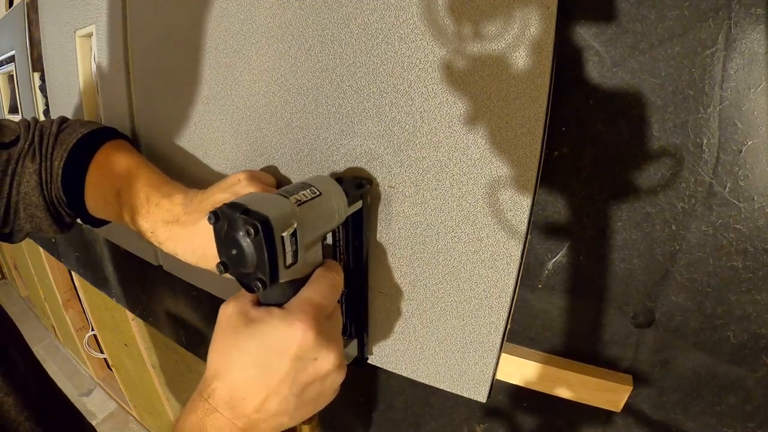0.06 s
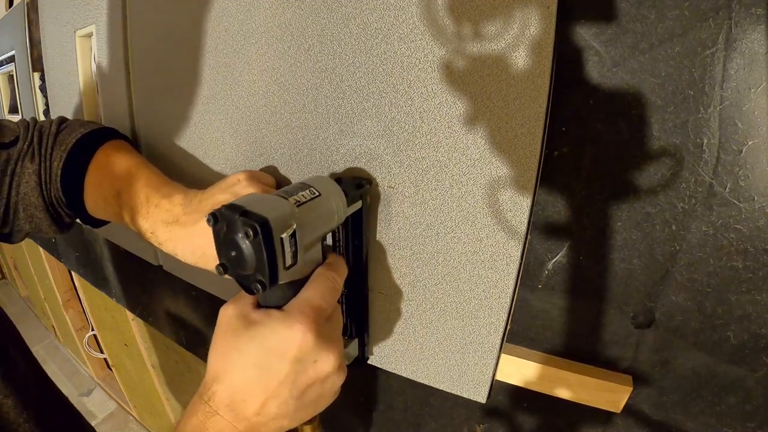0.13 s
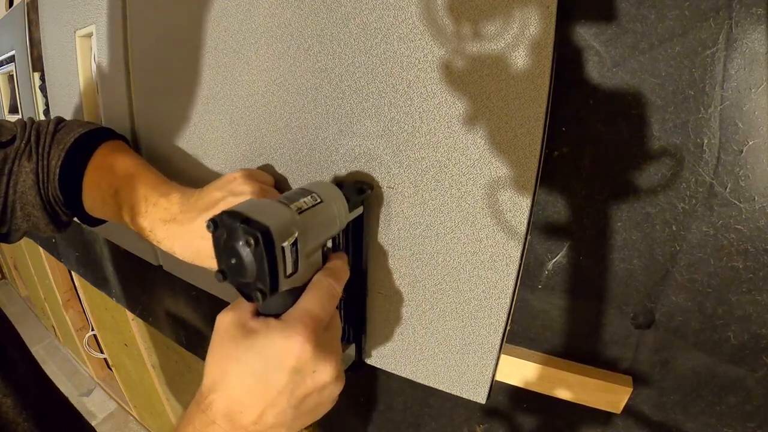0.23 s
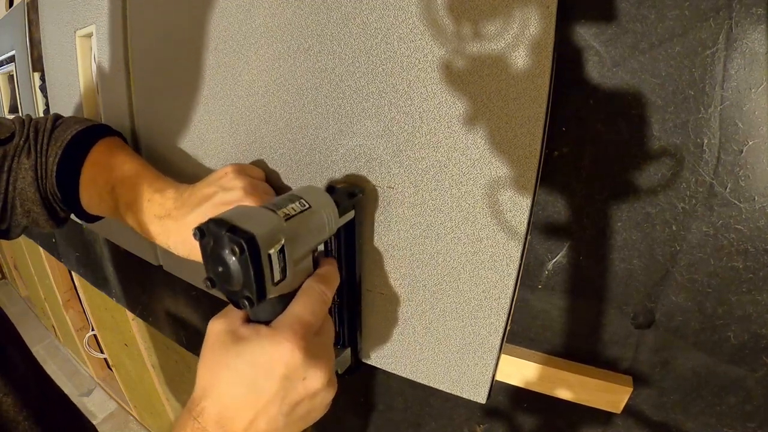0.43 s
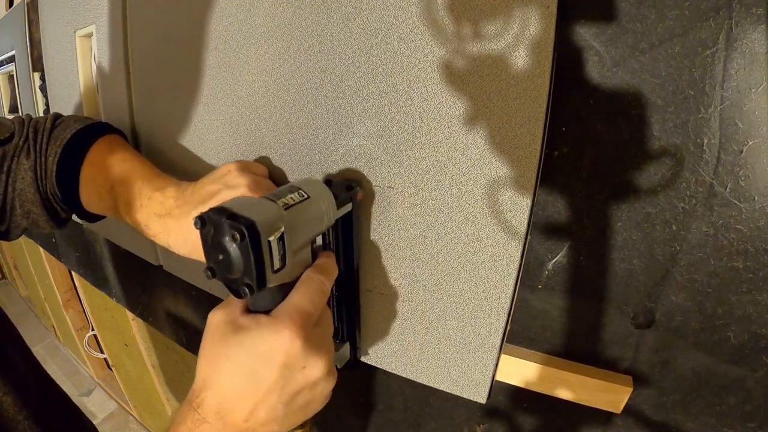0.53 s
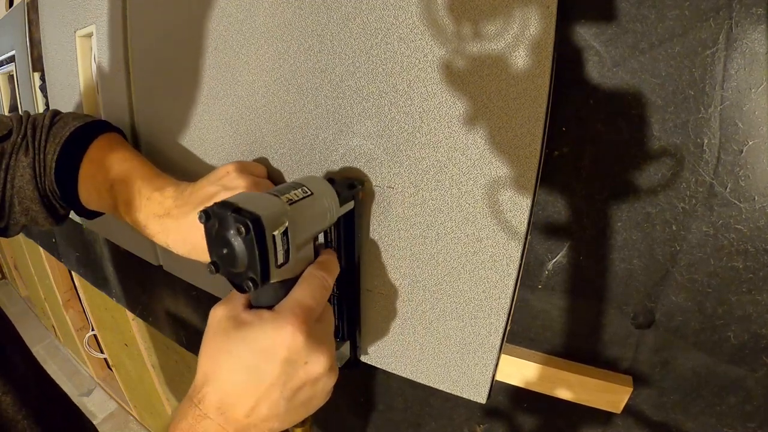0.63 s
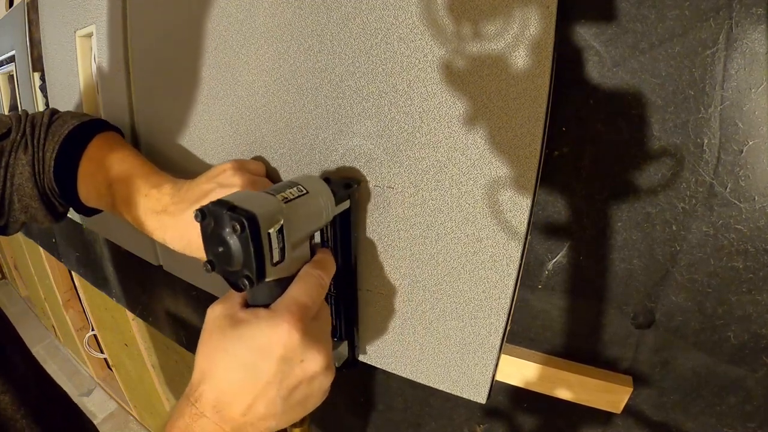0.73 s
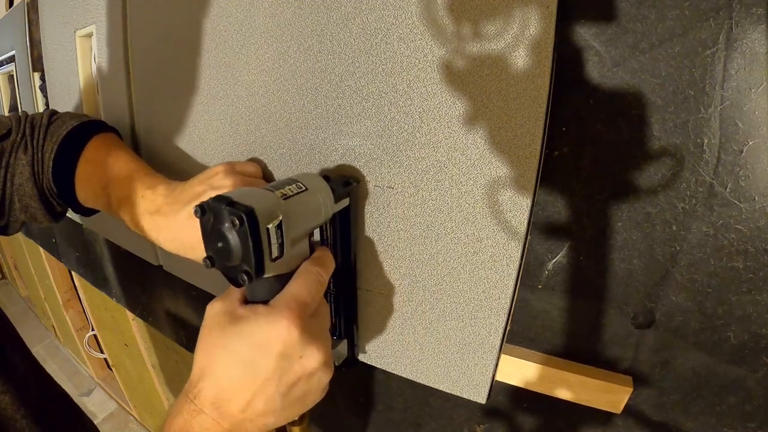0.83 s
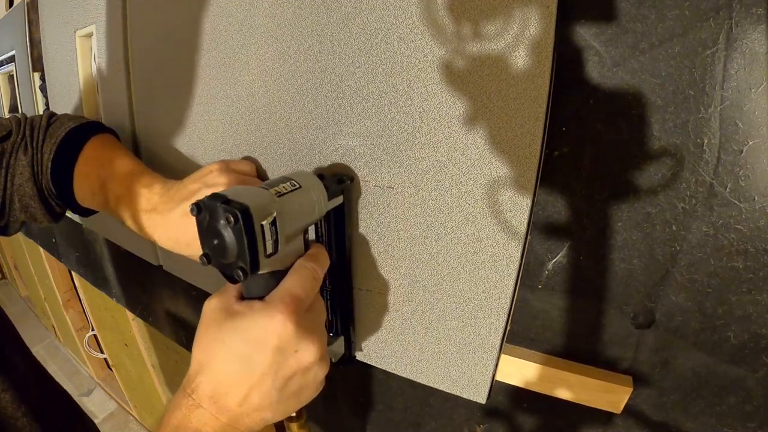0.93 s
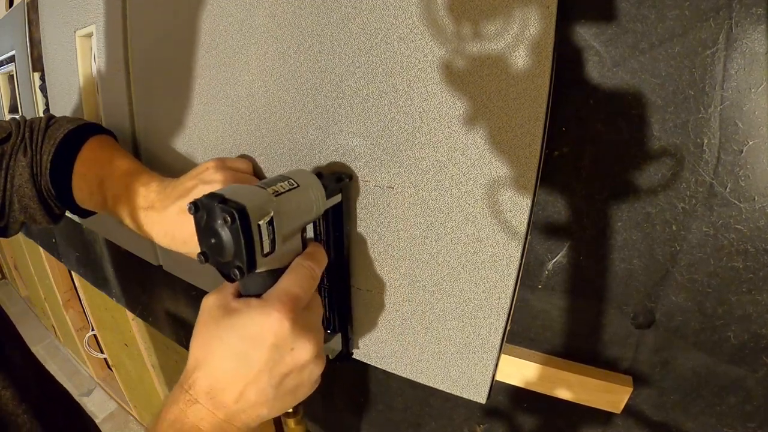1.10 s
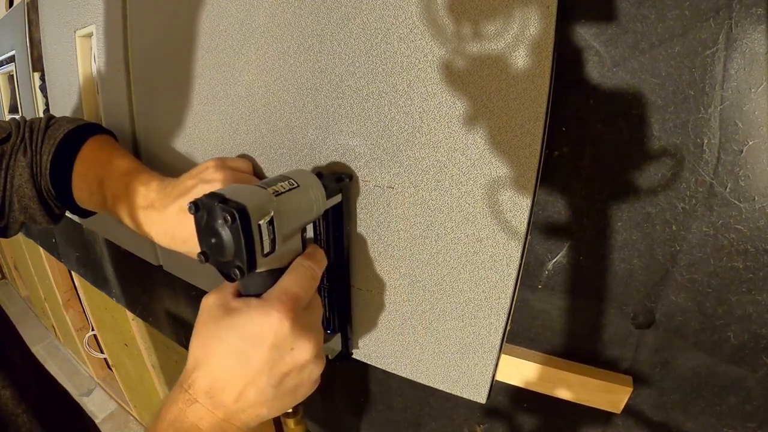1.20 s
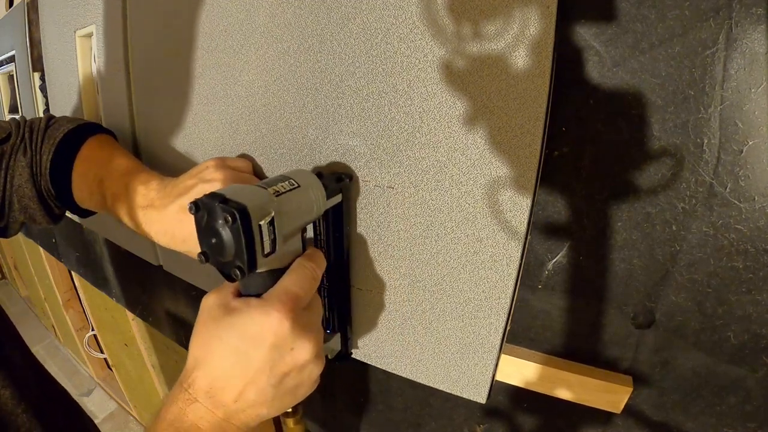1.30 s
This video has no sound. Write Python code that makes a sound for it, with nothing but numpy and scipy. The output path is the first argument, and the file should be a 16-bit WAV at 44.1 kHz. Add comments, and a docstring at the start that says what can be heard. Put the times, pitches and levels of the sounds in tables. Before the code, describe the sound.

One sharp shot from a pneumatic staple gun, with a puff of air and a thud.

```python
"""A tiny trigger tick, a rush of air, then the sharp crack of an air-driven staple gun firing once into a
wooden panel. The driver slams home, the exhaust blasts out and the piston jolts back. The workshop bench
thuds and shakes on; the small room answers over a faint hum and hiss.
Heard close, from one microphone fixed to the same bench."""
import sys
import numpy as np
from scipy import signal
from scipy.fft import rfft, irfft, next_fast_len
from scipy.io import wavfile
from scipy.ndimage import map_coordinates

SR = 44100
rng = np.random.default_rng(int(sys.argv[2]) if len(sys.argv) > 2 else 0)


def master(y):
    """Save y as 16-bit WAV."""
    cut = np.clip(np.atleast_2d(y).T, -1, 1)
    pcm = np.round(cut * 32767)  # scale
    wavfile.write(sys.argv[1], SR, pcm.astype(np.int16))


N = 59535
T = np.arange(N) / SR


def driver():
    """The blade strikes and rattles: each contact cracks and rings the gun; the first rings on in steel."""
    # contacts, down and back up: t/s, ring level/dB, crack level/dB
    blows = [(0.2065, -16, -18.5), (0.2073, -18, -19), (.2102, -20, -14.5), (0.2129, -22, -19),
             (0.2133, -27.5, -26), (0.2207, -28.5, -26), (0.2249, -32.5, -30), (.2885, -35.5, -39),
             (.3005, -39, -40), (.3085, -40, -42.5)]
    # spectrum of the crack: f/Hz, level/dB
    crack_tone = [(290, -38), (500, -7), (831, -9.5), (1640, -7), (2600, -7.5), (4150, -10.5), (12000, -16),
                  (15700, -23), (16000, -50.5)]
    # short-lived modes of the gun body: f/Hz, level/dB, t60/s
    body_modes = [(562.44, -6.5, 0.067), (988.5, -12, 0.066), (1241.3, -5.5, 0.033), (1470, -7, .05),
                  (1595, 7, .014), (1735, -4, .04), (1830, -5, 0.047), (2080, -10.5, 0.036),
                  (2940, -14.5, 0.016)]
    # long-ringing steel modes: f/Hz, level/dB, t60/s
    steel_modes = [(1109, -48, .75), (5372, -53, .65)]
    bursts = sum(amp(db) * decay(s, t60=0.022) for s, _, db in blows)
    crack = bursts * noise(lambda f: amp(along(crack_tone, f)))
    body = -sum(amp(db) * ring(s, body_modes, scatter_db=3.5) for s, db, _ in blows)
    return crack + body + ring(blows[0][0], steel_modes, scatter_db=2.0)


def air():
    """Each puff through the valve rises, holds and fades, hissing through the port resonances."""
    # puffs, inrush then exhaust: t/s, rise/s, hold/s, release t60/s, level/dB
    puffs = [(0.167, .008, 0.029006, 0.14, -30), (0.26, .01, 0.013, 0.042, -37.5),
             (0.2833, .002, 0.01, 0.05, -15), (0.295, .002, .004, .05, -31), (.31, .01, .01, 0.61, -49.5)]
    # spectrum of the rushing air: f/Hz, level/dB
    air_tone = [(300, -52.5), (800, -27.5), (1510, -25), (2800, -16), (3480, -14), (4710, -11.5),
                (5260, -9.5), (8740, -5), (14100, -7.5), (15700, -13), (16000, -44.5)]
    # port resonances: f/Hz, width/Hz, level/dB
    ports = [(4150, 200, -2), (5402, 100, -4), (7290, 400, 2.5), (8758, 970, 0), (9716.6, 400, -3.5),
             (13566, 1300, -6.5)]
    flow = sum(amp(db) * np.clip((T - s) / rise, 0, 1) ** 2 * fade(s + rise + hold, t60)
               for s, rise, hold, t60, db in puffs)
    flow *= fade(0.44, t60=0.17)  # the last air stops
    port_gain = lambda f: 1 + amp(-3.5) * sum(amp(db) * np.abs(peak(f, hz, w)) for hz, w, db in ports)
    return flow * noise(lambda f: amp(along(air_tone, f)) * port_gain(f))


def bench_thuds():
    """Soft pushes ring the low modes of panel and bench; loose wood rattles dully after each."""
    # jolts passed to the bench: t/s, level/dB, contact/s, signed weight, rattle level/dB
    jolts = [(0.2079, -23, 0.0020757, -0.8853, -39), (.213, -7.5, 0.0032, 0.76, -39),
             (0.2146, -6.5, 0.0014, -0.8, -42.5), (0.2174, -9, .002, 0.89, -43),
             (0.2259, -17, 0.0028, 0.83, -49), (0.255, -11, .008, 0.77, -37.5), (0.2844, -16, .004, 1, -32),
             (.2878, -14, 0.0038, -1, -34), (0.298, -15.5, .005, -1, -34.5),
             (.309, -12, 0.0043, 0.49, -40.5), (.337, -24, 0.0057, 0.28, -38),
             (0.349, -12, .008, 0.93, -44), (.396, -15.5, 0.009, 0.34, -54.5),
             (0.409, -17, 0.0084, -0.45, -53.5), (0.514, -59.5, 0.0033, 1, -74),
             (0.654, -55, 0.0041, 1, -71.5), (1.076, -45, 0.0048, -1.18, -69.5),
             (1.088, -38, 0.0075, 0.95, -72)]
    # modes of panel and bench: f/Hz, level/dB, t60/s
    wood_modes = [(27.2, -22, .25), (43.958, -13.5, 0.12), (74.25, -7.5, .06), (113.96, -9, 0.19),
                  (206.4, 1, 0.049), (280.5, -2, 0.062), (376.7, -26, .4)]
    # spectrum of the loose wood: f/Hz, level/dB
    rattle_tone = [(100, -29.5), (250, -7), (420, -8.5), (700, -13.5), (1200, -22), (4000, -58)]
    pushes, bursts = np.zeros((2, N))
    for s, db, contact, weight, rattle_db in jolts:
        pulse = (T >= s) * (T < s + contact) * np.sin(np.pi * (T - s) / contact) ** 2
        pushes += weight * amp(db) * pulse / (contact * SR / 2)  # divided by the pulse's area
        bursts += amp(rattle_db) * decay(s, t60=0.074)
    rattle = bursts * noise(lambda f: amp(along(rattle_tone, f)))
    thuds = signal.fftconvolve(pushes, ring(0, wood_modes, scatter_db=1.44))[:N]
    return thuds + rattle


def trigger():
    """Tiny metal ticks, just before the shot and again a second later."""
    # ticks: t/s, level/dB
    ticks = [(.137, -61), (0.157, -49.5), (0.1621, -54.5), (1.338, -57), (1.3406, -54)]
    # spectrum of a tick: f/Hz, level/dB
    tick_tone = [(2000, -28), (3500, -5), (5000, -9), (7500, 1.5), (11000, -0.5), (15000, -2)]
    bursts = sum(amp(db) * decay(s, t60=0.0055) for s, db in ticks)
    return bursts * noise(lambda f: amp(along(tick_tone, f)))


def bench_sway():
    """The hand keeps the bench swaying, rumbling and droning under the microphone."""
    # rumble bands: f/Hz, wander/Hz
    bands = [(22, 15), (47, 7), (112, 14), (150, 1), (222, 15)]
    # sway before the shot: t/s, then level/dB of each band
    before = [(0.0, -50, -48, -61, -82, -82), (0.026, -50, -55, -76, -69, -78),
              (0.044, -50.5, -53, -61.5, -85, -71.5), (0.09, -49.5, -57, -94, -65.5, -75.5),
              (0.15, -48, -55, -52, -67, -65)]
    # sway after the shot: t/s, then level/dB of each band
    after = [(0.46, -42.5, -33.5, -57, -62, -70.5), (0.502, -41.5, -46.5, -48, -73, -82),
             (0.554, -48.5, -40, -61.5, -58, -92), (0.63, -50.5, -49, -80, -66, -86),
             (0.664, -41, -50.5, -90, -92, -72), (0.716, -47, -55.5, -71, -88, -109),
             (0.784, -38.5, -53.5, -65.5, -72.5, -63.5), (0.828, -45.5, -52, -69, -79, -95),
             (0.858, -51, -52, -91, -70, -84), (0.938, -42, -79, -75, -67.5, -88.5),
             (1.02, -49.5, -70, -69.5, -68, -87), (1.088, -47.5, -56.5, -53.5, -59.5, -70.5),
             (1.138, -38, -40.5, -70, -62.5, -83), (1.22, -43.5, -48.5, -74, -64.5, -74.5),
             (1.306, -42, -53, -49.5, -68, -72.5), (1.35, -66.5, -45.5, -53, -59.5, -64)]
    times, *levels = np.transpose(before + after)
    return sum(amp(np.interp(T, times, db)) * wavering(hz, wander, rate_hz=24)
               for db, (hz, wander) in zip(levels, bands))


def room(x):
    """The small workshop answers 6 ms late; each frequency of the tail dies at its own speed."""
    # reverberation times: f/Hz, t60/s
    decay_times = [(200, 0.14), (700, .2), (1500, 0.19), (3000, 0.4), (6000, .25), (10000, 0.17),
                   (15000, .25)]
    hz, t, spectra = signal.stft(rng.standard_normal(SR // 2), SR, nperseg=256)
    spectra *= amp(-60 * t / along(decay_times, hz)[:, None])
    tail = signal.istft(spectra, SR, nperseg=256)[1]
    delayed = np.pad(x, (round(0.006 * SR), 0))
    return signal.fftconvolve(delayed, tail / np.linalg.norm(tail))[:N]


def slide():
    """The gun slides on the panel: one faint stroke of rubbing, with a thin whistle."""
    start_s, length_s = 0.63, 0.62557
    stroke = np.sin(np.pi * np.clip((T - start_s) / length_s, 0, 1))
    rub = amp(-83.5) * noise(lambda f: peak(f, hz=2175, width_hz=339.1))
    whistle = amp(-93) * wavering(hz=11200, wander_hz=200, rate_hz=5.6)
    return stroke * (rub + whistle)


def hum():
    """A faint, slightly wavering hum in the room."""
    return amp(-81.5) * wavering(hz=384.1, wander_hz=3.3, rate_hz=3)


def hiss():
    """Steady room tone, strongest in the low range."""
    # spectrum of the room tone: f/Hz, level/dB
    room_tone = [(100, -27.5), (170, -1), (183, -12.5), (351, -10), (386, -7), (441, -14), (813, -16),
                 (3400, -25.5), (10900, -28.5), (16200, -32.5)]
    return amp(-72.5) * noise(lambda f: amp(along(room_tone, f)))


def amp(db):
    return 10 ** (np.asarray(db) / 20)


def along(points, hz):
    """Interpolate (f/Hz, value) points on a log frequency axis."""
    f, v = np.transpose(points)
    return np.interp(np.log(hz + 1), np.log(f + 1), v)


def filtered(x, response):
    """x shaped by a frequency response."""
    size = next_fast_len(N + SR // 2)
    return irfft(rfft(x, size) * response(np.fft.rfftfreq(size, 1 / SR)), size)[..., :N]


def noise(response):
    """Coloured noise of rms 1."""
    x = filtered(rng.standard_normal(N), response)
    return x / np.sqrt(np.mean(x ** 2) + 1e-20)


def peak(f, hz, width_hz):
    """One resonance, gain 1 at its centre."""
    return 1j * f * width_hz / (hz * hz - f * f + 1j * f * width_hz)


def fade(s, t60):
    """Full level until time s, then falling 60 dB every t60 seconds."""
    return amp(-60 * np.clip(T - s, 0, None) / t60)


def decay(s, t60):
    """Silent until time s, then dying away from full level."""
    return (T >= s) * fade(s, t60)


def ring(s, modes, scatter_db):
    """Modes struck at time s, their levels scattered at random."""
    return sum(amp(db + scatter_db * rng.normal()) * decay(s, t60) * np.sin(2 * np.pi * hz * (T - s))
               for hz, db, t60 in modes)


def wavering(hz, wander_hz, rate_hz):
    """A tone of rms 1 whose pitch wanders at random."""
    drift = map_coordinates(rng.standard_normal(int(N * rate_hz / SR) + 4), [T * rate_hz])
    cycles = np.cumsum(hz + wander_hz * drift) / SR
    return np.sqrt(2) * np.sin(2 * np.pi * (cycles + rng.random()))


def scene():
    """Gun and bench sit in the centre; a faint copy of the driver and of the hiss above 250 Hz differs slightly
    between the two channels."""
    gun = trigger() + air() + driver()
    mid = gun + amp(-16) * room(gun) + bench_thuds() + bench_sway() + slide() + hum() + hiss()
    side = amp(-31.5) * driver() + amp(-15.5) * filtered(hiss(), lambda hz: hz > 250)
    return np.array([mid + side, mid - side])


def record(dry):
    """The recorder clips the peaks softly and passes nothing above its band limit."""
    ceiling, top_hz = 0.66, 16300
    clipped = dry / (1 + np.abs(dry / ceiling) ** 6) ** (1 / 6)
    return filtered(clipped, lambda hz: hz < top_hz)


dry = scene()
out = record(dry)
master(out)
```